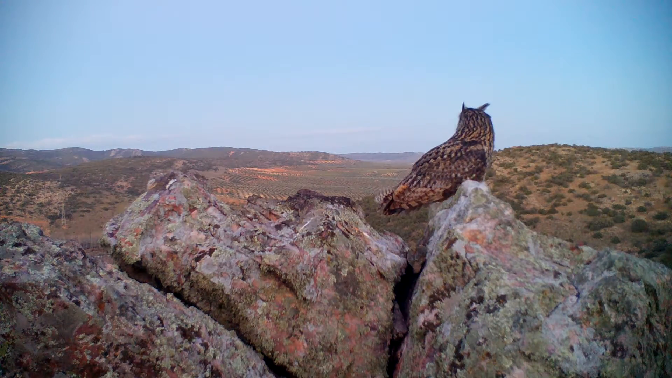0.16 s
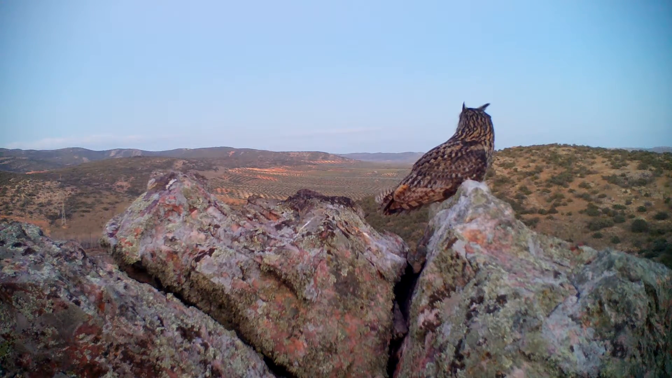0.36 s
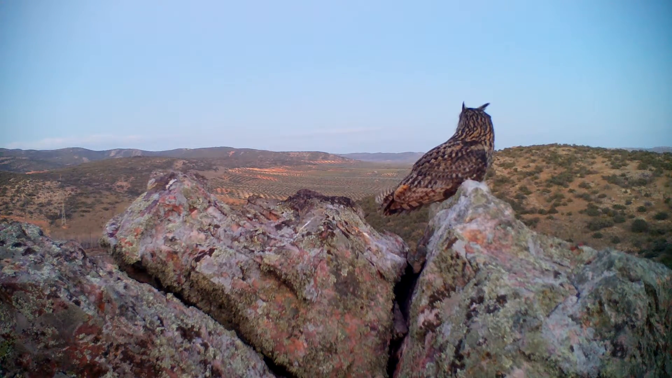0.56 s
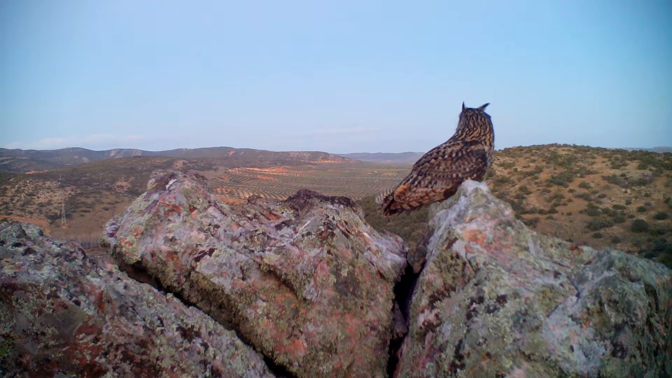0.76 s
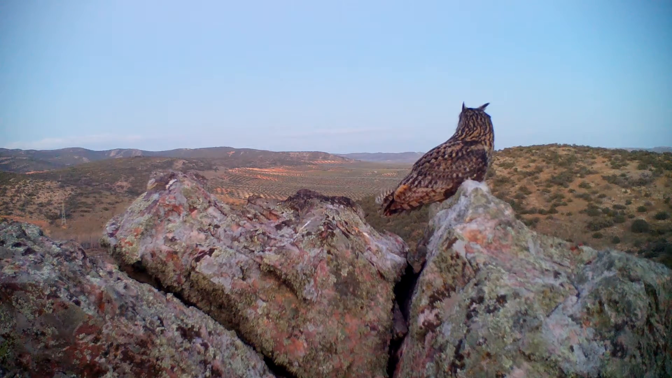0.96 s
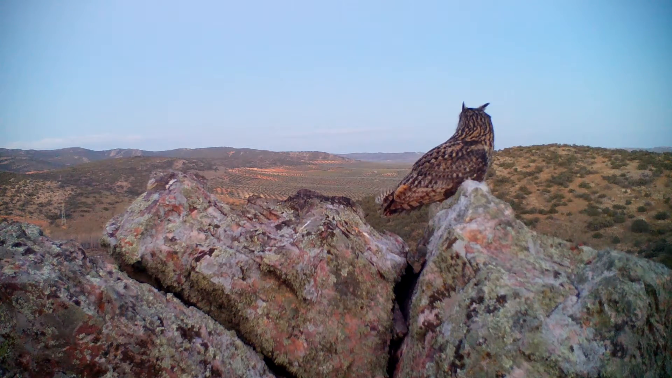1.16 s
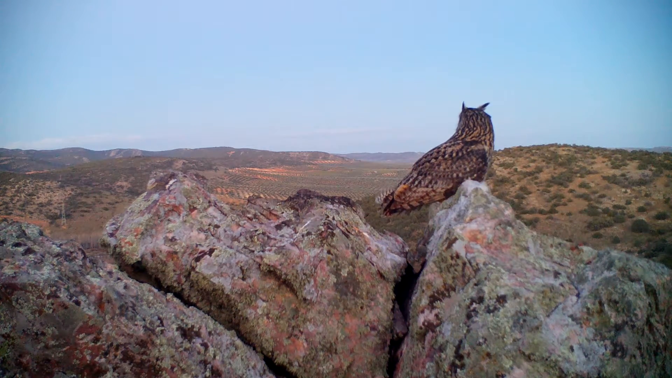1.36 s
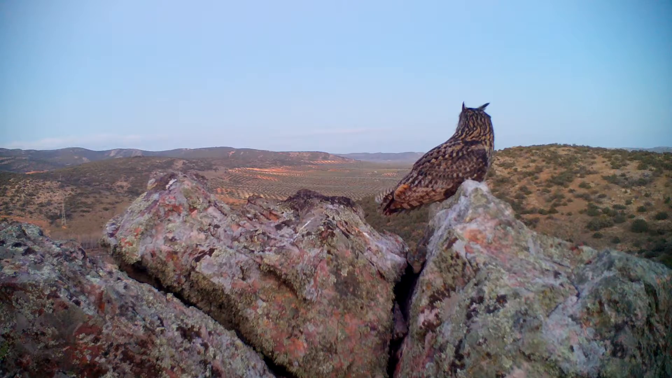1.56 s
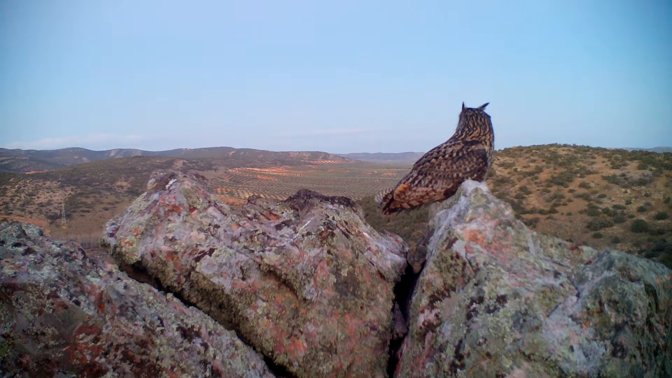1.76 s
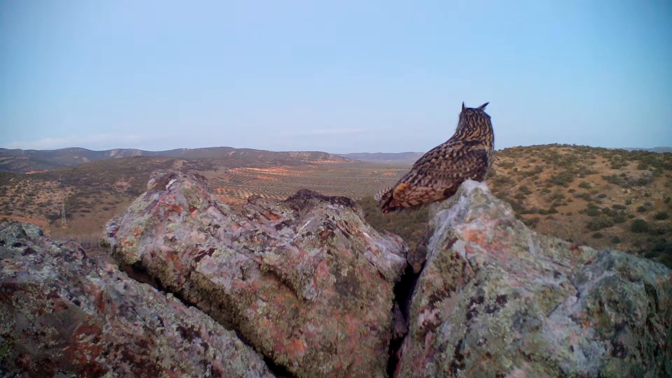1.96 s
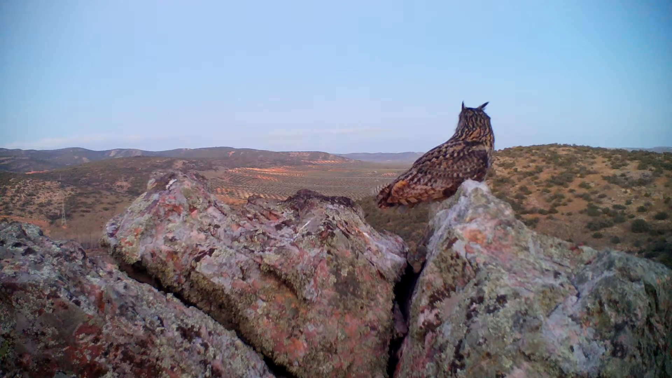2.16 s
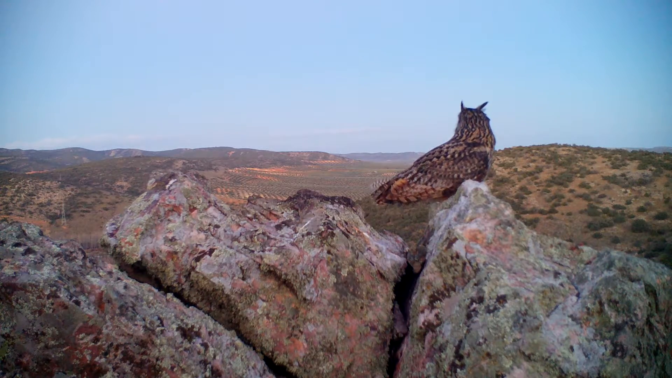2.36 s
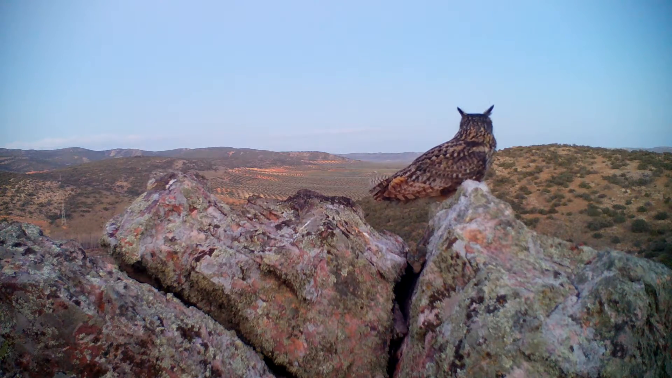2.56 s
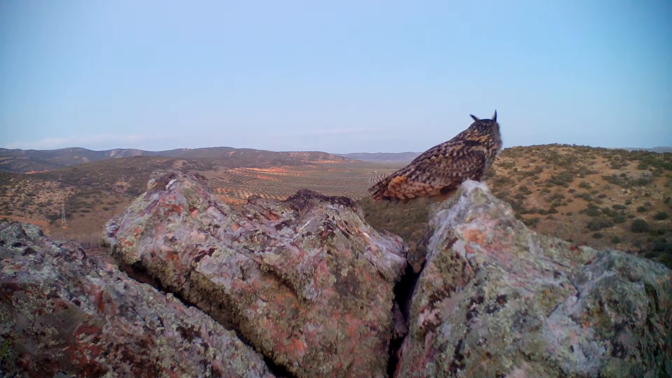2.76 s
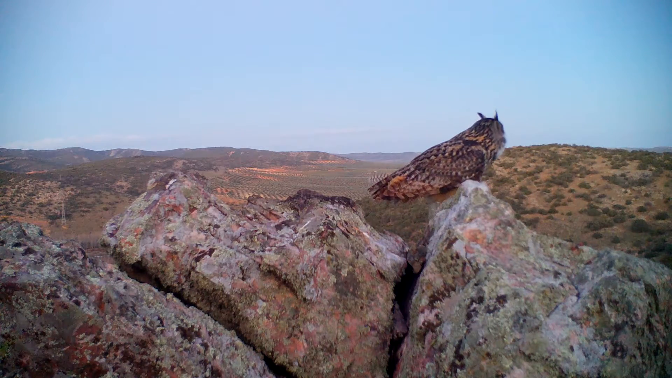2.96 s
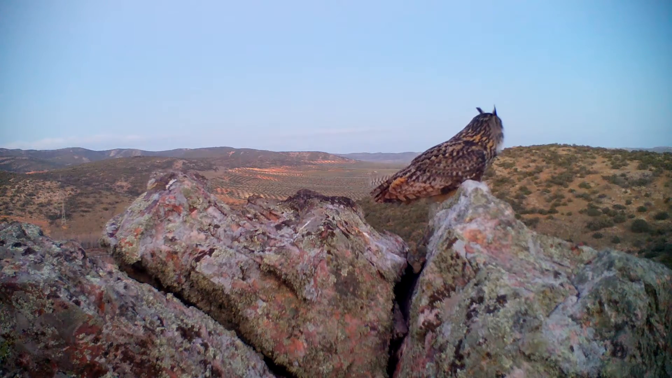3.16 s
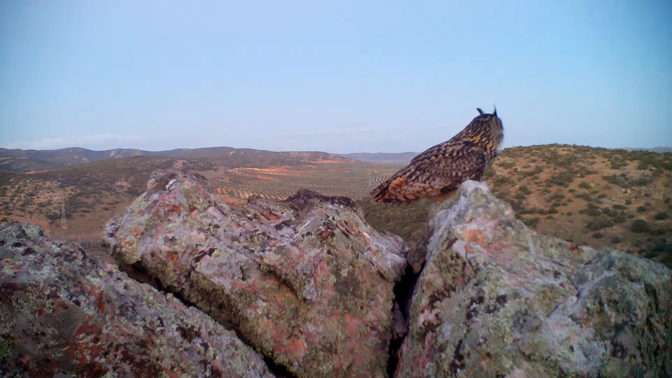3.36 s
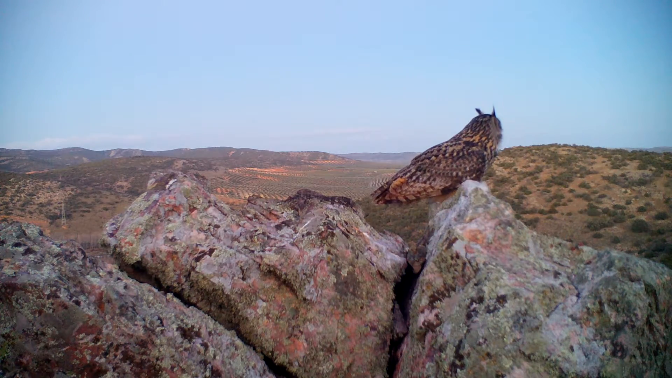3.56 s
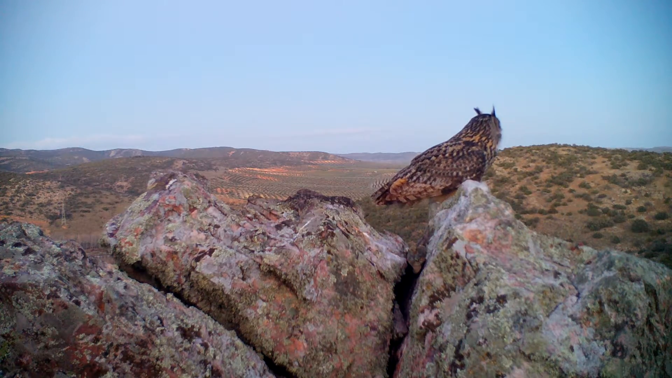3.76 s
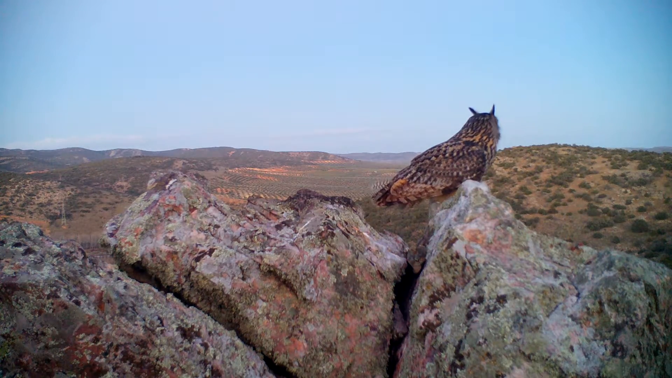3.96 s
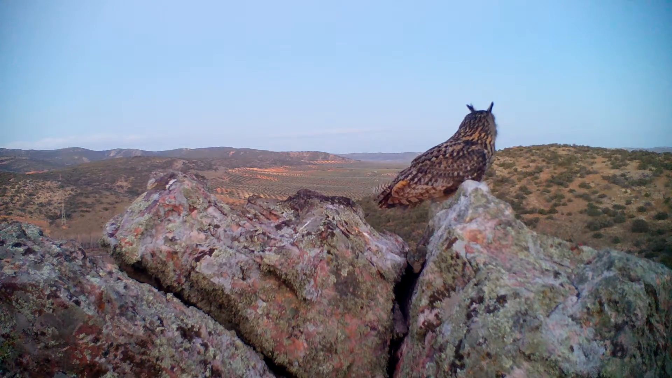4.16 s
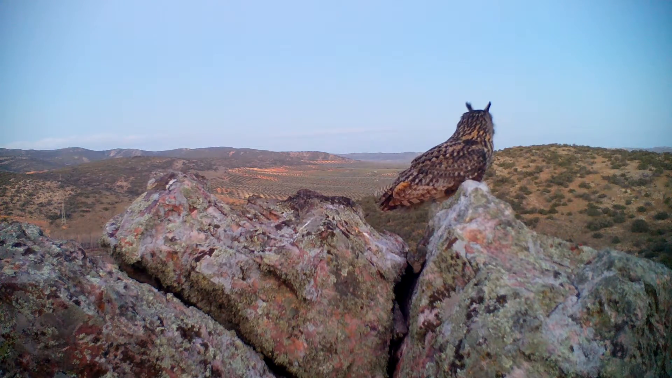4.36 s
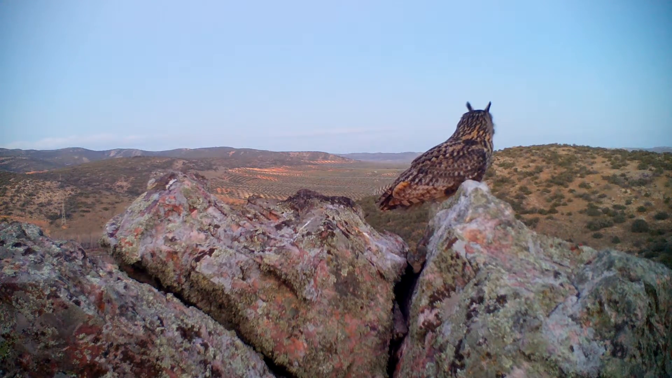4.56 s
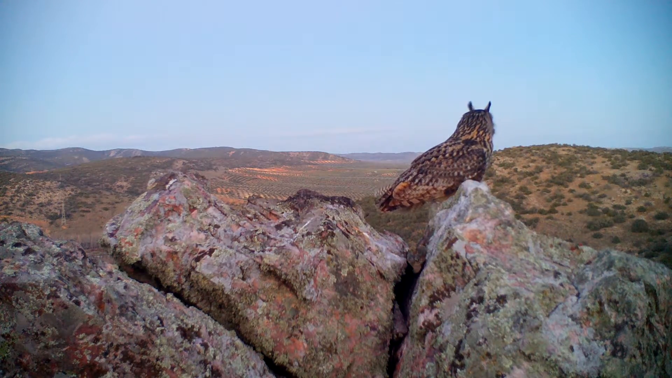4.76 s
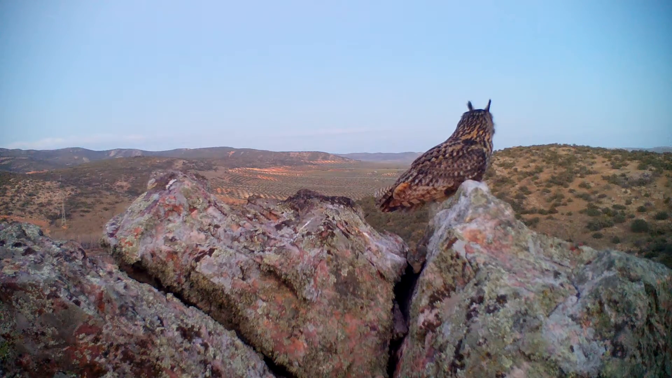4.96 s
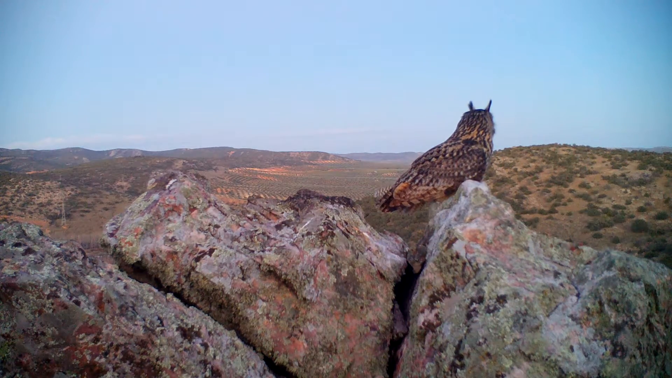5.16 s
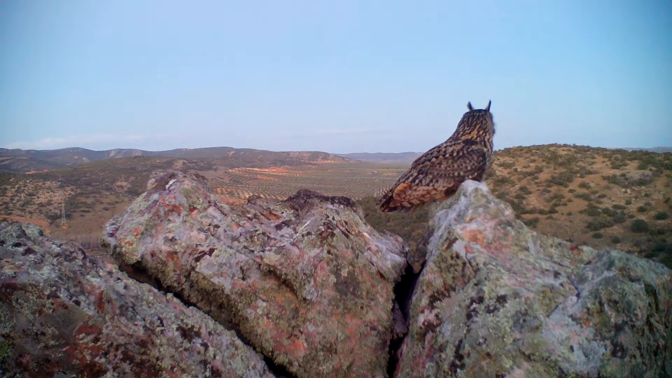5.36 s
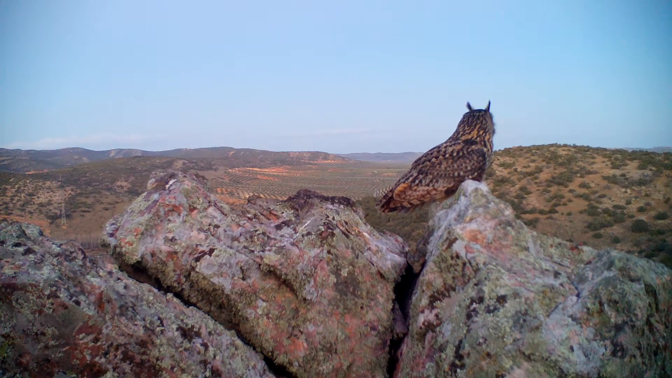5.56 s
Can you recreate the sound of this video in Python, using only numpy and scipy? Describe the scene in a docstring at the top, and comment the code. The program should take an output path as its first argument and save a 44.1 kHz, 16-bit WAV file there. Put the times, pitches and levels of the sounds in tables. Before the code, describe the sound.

A steady, slightly wavering hush of distant air runs throughout, with a very thin, buzzy high whine and faint hiss beneath. At about 1.8 and 2.1 seconds small birds give tiny two-part whistles, leaping upward to a high tone. At 2.4 an eagle owl in the foreground gives one deep, nearly pure hoot: it swells quickly, rises to a held pitch around 360 hertz, then sinks from 2.6 and breaks into a weak, rough croak by 3.05, leaving a faint outdoor tail. Sparse weak whistles and short chirps continue from 3.1 to 4.3. From 4.3 to 5.0 a quick twitter of seven scratchy, arched notes runs, overlapped by whistles that become louder and slide downward. Around 5.1 to 5.4 several dull low bumps sound within a short lumpy rumble, the strongest near 5.2. A last falling whistle comes at 5.4 and a hoarse chirp near 5.6.

```python
"""An even hush of distant air (slowly wavering noise) and a thin polarity-flipping whine run throughout.
Small birds call first: thin whistles, two swept tones each. Then an eagle owl gives one deep hoot on a
rocky hillside, harmonics gliding through throat resonances; it swells, holds, sinks and ends in a croak.
More whistles and chirps follow, then a twitter of arched, zigzagging notes. Near the end dull bumps
(short low pulses) sound amid a lumpy noise rumble, between the last whistles and chirps."""
import sys
import numpy as np
from scipy import signal
from scipy.fft import rfft, irfft, next_fast_len
from scipy.io import wavfile
from scipy.ndimage import uniform_filter1d, map_coordinates

SR = 44100
rng = np.random.default_rng(int(sys.argv[2]) if len(sys.argv) > 2 else 0)


def waveform_to_disk(signal):
    """Save audio, clipped to [-1, 1], as 16-bit WAV at the path in sys.argv[1]."""
    frames = np.transpose(np.atleast_2d(signal))
    scaled = np.clip(frames, -1, 1) * 32767
    samples = np.round(scaled).astype(np.int16)
    wavfile.write(sys.argv[1], SR, samples)


N = 246959

# spectral shape of distant air: (frequency [Hz], relative density [dB])
AIR_SHAPE = [(12, -57.5), (20, -14), (70, -17.5), (256, -6.5), (450, -5), (561, -3), (603, -2), (893, -0.5),
             (1030, -3.5), (1170, -2.5), (2630, -11), (4180, -23), (4850, -29.5), (7000, -36.5),
             (9100, -68.5), (15400, -120)]
# spectral shape of the rumble: (frequency [Hz], relative density [dB])
RUMBLE_SHAPE = [(20, -0.5), (60, 10.5), (150, -5.5), (260, -7.5), (420, -18), (1000, -56)]
# dull bumps: (peak time [s], peak level [dB], pitch [Hz])
BUMPS = [(5.078, -43, 97), (5.113, -36, 170.6), (5.194, -39.5, 260), (5.210, -35, 282), (5.221, -27, 151),
         (5.229, -35, 370), (5.239, -36.5, 155), (5.288, -45.5, 167), (5.367, -42.5, 123)]
# twitter notes: (start [s], source level [dB], pitch ratio [1])
TWITTER_NOTES = [(4.340, -52, 1.03), (4.424, -52, 1.02), (4.523, -52, 1.0), (4.639, -56.5, .97),
                 (4.745, -54.5, .98), (4.854, -55.5, .97), (4.959, -53.5, 1.0)]
# two-voiced whistles: (leap time [s], length [s], source level [dB], starting pitch [Hz], glide [Hz])
WHISTLES = [(1.78, 0.069, -65, 4580, 469), (2.104, 0.066, -66, 4620, 330), (3.074, 0.052, -72, 4630, 400),
            (3.32, .06, -76.5, 4590, 322), (3.556, 0.037, -72, 4540, 420), (4.052, 0.047, -66.5, 4660, 458),
            (4.525, 0.075, -70, 4850, -20), (4.68, 0.072, -67.5, 4880, -90),
            (4.863, 0.073, -56.5, 4765, -100), (5.017, 0.069, -55.5, 4770, -340),
            (5.167, 0.059, -53.5, 5055, -510), (5.42, 0.073, -58, 4830, -690)]
# lower, slurred chirps placed one by one:
# (start [s], length [s], source level [dB], pitch after the lift [Hz], last pitch [Hz])
SINGLE_CHIRPS = [(3.506, .024, -64, 2710, 2940), (4.272, .023, -62.5, 3410, 2220),
                 (4.666, 0.0118, -53.5, 2980, 2240), (4.726, 0.017, -61, 2660, 2400),
                 (5.302, .048, -52.5, 3460, 1834), (5.559, 0.04, -51, 3670, 3230)]
# pitch of the hoot: (time [s], pitch [Hz])
HOOT_PITCH = [(2.375, 173.4), (2.385, 227), (2.391, 261.7), (2.405, 304), (2.423, 334), (2.451, 355.4),
              (2.609, 360.1), (2.641, 347), (2.689, 312.6), (2.849, 280.9), (2.941, 254.7), (2.997, 223.5),
              (3.015, 178.3), (3.04, 152.7)]
# throat resonances, shared by all harmonics: (frequency [Hz], level [dB])
THROAT = [(220, -39), (265, -35), (285, -34), (305, -29.5), (328, -23.5), (360, -24.0), (450, -18.5),
          (560, -34.5), (612, -47.5), (640, -34.5), (715, -36.0), (760, -32.5), (835, -31.5), (950, -52.0),
          (1020, -69), (1075, -52), (1290, -61.5), (1400, -52), (1640, -56.5), (1790, -63.5), (2150, -74.5),
          (2900, -76.5)]
# spectral shape of the rough voice's rasp: (frequency [Hz], relative density [dB])
RASP_SHAPE = [(120, -23), (300, -3.5), (430, 5), (600, -7), (800, -0.5), (1100, -24), (2000, -33),
              (5000, -120)]

BAND_LIMIT_HZ = 15740

# rumble: holds between these times
RUMBLE_DB, RUMBLE_FROM_S, RUMBLE_TO_S = -58.5, 5.124, 5.374
RUMBLE_RISE_DB_PER_S, RUMBLE_FALL_DB_PER_S = 41, 152

# twitter note: an arch of pitch, with a zigzag on the way down
NOTE_S, NOTE_FOOT_HZ, NOTE_TOP_HZ = 0.043, 1880, 4630  # pitches at ratio 1, before the zigzag
VOICE_GAP_HZ = 2740  # second side of the syrinx over the first, at ratio 1
ZIGZAG_HZ, ZIGZAG_DEPTH_HZ, ZIGZAG_START_S = 135.1, 490, 0.01715
TOP_FADE_DB, NOTE_SWELL_DB = 9.5, 2  # thins toward the top of the arch; grows start to end

# whistle
BLIP_END_HZ, BLIP_FALL_HZ_PER_S = 2366, 28000
SCOOP_S = 0.016  # time constant of a rising glide
HIGH_VOICE_GAP_HZ, GAP_PER_FALL = 1073, 0.3  # gap widens by this share of the fall
BLIP_BASE_DB, HIGH_VOICE_BASE_DB = -39.5, -53.5
LEVEL_FOLLOW = 0.28  # share of the whistle's dB added to both base levels
LEAD_S, LEAD_DB, LEAD_LIFTED_HZ, LEAD_LAST_HZ = 0.024, -5, 3400, 2607  # chirp leading into a falling whistle

# hoot
HOOT_START_S, HOOT_END_S = 2.369, 3.056
SWELL_S, SWELL_DB = 0.074, 33.5  # breath build-up
EBB_FROM_S, EBB_DB_PER_S = 2.636, 49.5
CROAK_FROM_S, CROAK_BREAK_S, CROAK_DROP_DB = 2.998, 0.018, 6.5  # voice breaks into a weaker croak
ONSET_ROUGH, CROAK_ROUGH, HELD_ROUGH = 0.2, 0.26, 0.006  # the first two add to the held roughness


def amp(db):
    """Decibels to gain."""
    return 10 ** (np.asarray(db) / 20)


def unit(x):
    """Scale to rms 1."""
    return x / np.sqrt(np.mean(x ** 2) + 1e-20)


def along(points, hz):
    """Interpolate (frequency [Hz], value) points on a log frequency axis."""
    f, v = np.transpose(points)
    return np.interp(np.log(hz + 1), np.log(f), v)


def curves(rows, t):
    """Interpolate each column after the time at times t."""
    s, *cols = np.transpose(rows)
    return [np.interp(t, s, c) for c in cols]


def wobble(rate_hz, t):
    """Smooth random curve with rate_hz knots a second."""
    knots = rng.standard_normal(int(len(t) * rate_hz / SR) + 4)
    return map_coordinates(knots, [np.arange(len(t)) * rate_hz / SR])


def filtered(x, response):
    """Multiply the spectrum of x by a response of frequency."""
    m = next_fast_len(N + SR // 2)
    return irfft(rfft(x, m) * response(np.fft.rfftfreq(m, 1 / SR)), m)[:N]


def noise(shape):
    """Spectrally shaped noise of rms 1."""
    return unit(filtered(rng.standard_normal(N), lambda hz: amp(along(shape, hz))))


def tone(hz):
    """Sinusoid of rms 1 following a pitch curve."""
    return np.sqrt(2) * np.cos(2 * np.pi * np.cumsum(hz) / SR)


def fade(t, start, end, rise, fall):
    """Gate with sine-squared edges."""
    ramp = np.clip(np.minimum((t - start) / rise, (end - t) / fall), 0, 1)
    return np.sin(np.pi / 2 * ramp) ** 2


def add(track, start_s, sound):
    """Mix a sound in at start_s."""
    part = track[round(start_s * SR):][:len(sound)]
    part += sound[:len(part)]


def hillside(x, t60_s, wet_db):
    """Rocks and scrub scatter back a thin, decaying noise tail."""
    t = np.arange(SR) / SR
    tail = rng.standard_normal(SR) * amp(-60 * t / t60_s) * (1 - np.exp(-t / 0.0025))
    return x + amp(wet_db) * signal.fftconvolve(x, tail / np.linalg.norm(tail))[:N]


def air():
    """Hush of distant air, rolled off above 7.5 kHz and wavering slightly."""
    hush = unit(filtered(noise(AIR_SHAPE), lambda hz: 1 / (1 + (hz / 7500) ** 8)))
    return amp(-59.5 + 0.45 * wobble(3.17, np.arange(N) / SR)) * hush


def electronics(whine_db, hiss_db):
    """Thin whine whose polarity flips about sixty times a second, over faint white hiss."""
    t = np.arange(N) / SR
    polarity = np.tanh(9 * np.sin(2 * np.pi * 29.7 * t))  # two flips a cycle
    whine = np.sin(2 * np.pi * 7797.5 * t) * polarity
    return amp(whine_db) * unit(whine) + amp(hiss_db) * rng.standard_normal(N)


def bumps():
    """Low pulses too short to ring, amid a lumpy rumble that swells, holds and dies."""
    t = np.arange(N) / SR
    rise_db = RUMBLE_RISE_DB_PER_S * np.maximum(RUMBLE_FROM_S - t, 0)
    fall_db = RUMBLE_FALL_DB_PER_S * np.maximum(t - RUMBLE_TO_S, 0)
    rumble_db = RUMBLE_DB - rise_db - fall_db
    out = amp(rumble_db + 1.8 * wobble(25, t)) * noise(RUMBLE_SHAPE)
    near = np.arange(-SR // 40, SR // 40) / SR
    for peak_s, db, hz in BUMPS:
        pulse = np.cos(2 * np.pi * hz * near) * np.exp(-(near * hz / 0.48) ** 2)
        add(out, peak_s + near[0], amp(db) * pulse)
    return out


def syrinx(low_hz, high_hz, high_db, flutter, rasp):
    """Two unsteady voices; squaring their sum couples them, adding octaves, sum and difference tones."""
    low, high = [tone(hz * (1 + flutter * wobble(700, hz))) * (1 + rasp * wobble(600, hz))
                 for hz in (low_hz, high_hz)]
    both = low + amp(high_db) * high
    coupling = both ** 2 - uniform_filter1d(both ** 2, size=24)  # slow part removed
    return both + rasp * 0.5 * coupling


def twitters(scratch_db=-20, overtone_db=-18):
    """Quick run of scratchy arched notes, each breaking into a zigzag on the way down."""
    out, t = np.zeros(N), np.arange(int(NOTE_S * SR)) / SR
    arch = 1 - (2 * t / NOTE_S - 1) ** 2
    zigzag = np.sin(2 * np.pi * ZIGZAG_HZ * np.maximum(t - ZIGZAG_START_S, 0))
    span_hz = NOTE_TOP_HZ - NOTE_FOOT_HZ
    low_hz = NOTE_FOOT_HZ + span_hz * arch - ZIGZAG_DEPTH_HZ * zigzag
    height = (low_hz - NOTE_FOOT_HZ) / span_hz
    shape_db = NOTE_SWELL_DB * (t / NOTE_S - 0.5) - TOP_FADE_DB * height ** 2
    for start_s, db, ratio in TWITTER_NOTES:
        note = syrinx(ratio * low_hz, ratio * (low_hz + VOICE_GAP_HZ), high_db=-6, flutter=0.015, rasp=0.3)
        scratch = amp(scratch_db) * np.diff(rng.standard_normal(len(t) + 1))
        edge = scratch + amp(overtone_db) * tone(2 * ratio * low_hz)
        note = note + height * edge  # harshest at the top
        gate = fade(t, 0, NOTE_S, rise=0.0036, fall=0.0034)
        add(out, start_s, amp(db + shape_db) * gate * note)
    return out


def chirp(length_s, lifted_hz, last_hz, high_ratio, high_db):
    """Hoarse chirp that lifts quickly and then slides to its last pitch, with a weaker voice above it."""
    u = np.arange(int(length_s * SR)) / (length_s * SR)
    hz = np.interp(u, [0, 0.3, 1], [0.62 * lifted_hz, lifted_hz, last_hz])
    voices = syrinx(hz, high_ratio * hz, high_db, flutter=0.029, rasp=0.064)
    return fade(u, 0, 1, rise=0.31, fall=0.04) * voices


def chirps():
    """A few chirps are placed singly, some close to or over whistles; one leads into each falling whistle."""
    out = np.zeros(N)
    for start_s, length_s, db, lifted_hz, last_hz in SINGLE_CHIRPS:
        add(out, start_s, amp(db) * chirp(length_s, lifted_hz, last_hz, high_ratio=1.19, high_db=-7.0))
    for leap_s, _, db, _, glide_hz in WHISTLES:
        if glide_hz < 0:
            lead = chirp(LEAD_S, LEAD_LIFTED_HZ, LEAD_LAST_HZ, high_ratio=1.95, high_db=-11)
            add(out, leap_s - LEAD_S, amp(db + LEAD_DB) * lead)
    return out


def whistles(sag=0.08):
    """A sliding blip about an octave down, then a leap to a gliding tone whose high voice sags."""
    out = np.zeros(N)
    for leap_s, length_s, db, pitch_hz, glide_hz in WHISTLES:
        t = np.arange(-SR // 80, int(length_s * SR)) / SR
        leap = 0.5 + 0.5 / (1 + np.exp(-t / 0.00056))
        if glide_hz > 0:  # rises come early, falls late
            glide = 1 - np.exp(-np.maximum(t, 0) / SCOOP_S)
        else:
            glide = np.maximum(t / length_s, 0) ** 1.67
        low_hz = (pitch_hz + glide_hz * glide) * leap
        high_start_hz = pitch_hz + HIGH_VOICE_GAP_HZ - GAP_PER_FALL * glide_hz
        high_hz = high_start_hz * (1 - sag * (t / length_s) ** 2) * leap
        high_db = HIGH_VOICE_BASE_DB + LEVEL_FOLLOW * db - db  # relative to the low voice
        voices = syrinx(low_hz, high_hz, high_db, flutter=0.013, rasp=0.11)
        held = amp(db) * voices * fade(t, -0.001, length_s, rise=0.0085, fall=0.029)
        blip = tone(BLIP_END_HZ - BLIP_FALL_HZ_PER_S * t) * fade(t, t[0], 0, rise=0.0063, fall=0.0009)
        add(out, leap_s + t[0], held + amp(BLIP_BASE_DB + LEVEL_FOLLOW * db) * blip)
    return out


def small_birds(rock_db=-9, rock_s=0.0019, dull_db=-13):
    """Calls arrive directly and off the rocks, with dulled top treble; the whistles' tail lasts longest."""
    short_calls = hillside(twitters() + chirps(), t60_s=0.15, wet_db=-9)
    calls = short_calls + hillside(whistles(), t60_s=0.18, wet_db=-9.0)

    def path(hz):
        bounce = 1 + amp(rock_db) * np.exp(-2j * np.pi * hz * rock_s)
        return bounce * amp(np.interp(hz, [7600, 9400], [0, dull_db]))
    return filtered(calls, path)


def owl(rasp_db=-41, count=8):
    """Nearly pure hoot; as pitch sinks below the throat's resonance, the overtones take over."""
    t = np.arange(N) / SR
    pitch_hz, = curves(HOOT_PITCH, t)
    pitch_hz = uniform_filter1d(pitch_hz, size=400)
    starting = np.clip(1 - (t - HOOT_START_S) / SWELL_S, 0, 1) ** 2
    croaking = np.clip((t - CROAK_FROM_S) / CROAK_BREAK_S, 0, 1)
    ebb_db = EBB_DB_PER_S * np.maximum(t - EBB_FROM_S, 0)
    breath_db = -SWELL_DB * starting - ebb_db - CROAK_DROP_DB * croaking
    rough = HELD_ROUGH + ONSET_ROUGH * starting + CROAK_ROUGH * croaking
    shaky_hz = pitch_hz * (1 + 0.0004 * wobble(30, t) + 0.11 * rough * wobble(170, t))
    voice = np.zeros(N)
    for k in range(1, count + 1):
        level = amp(breath_db + along(THROAT, k * pitch_hz))
        voice += level * tone(k * shaky_hz) * (1 + rough * wobble(130, t))
    pulsing = 1 + 0.5 * tone(shaky_hz)  # once a cycle
    rasp = amp(rasp_db) * rough * noise(RASP_SHAPE) * pulsing
    gate = fade(t, HOOT_START_S, HOOT_END_S, rise=0.0057, fall=0.0078)
    return hillside((voice + rasp) * gate, t60_s=0.89, wet_db=-32.5)


def scene():
    """Quiet hillside, whine and bumps, small birds, and the owl in front."""
    background = air() + electronics(whine_db=-80.5, hiss_db=-87) + bumps()
    return (background + small_birds() + owl())[None]


def record(dry):
    """Remove everything at and above the band limit."""
    return filtered(dry[0], lambda hz: hz < BAND_LIMIT_HZ)[None]


dry = scene()
out = record(dry)
waveform_to_disk(out)
```